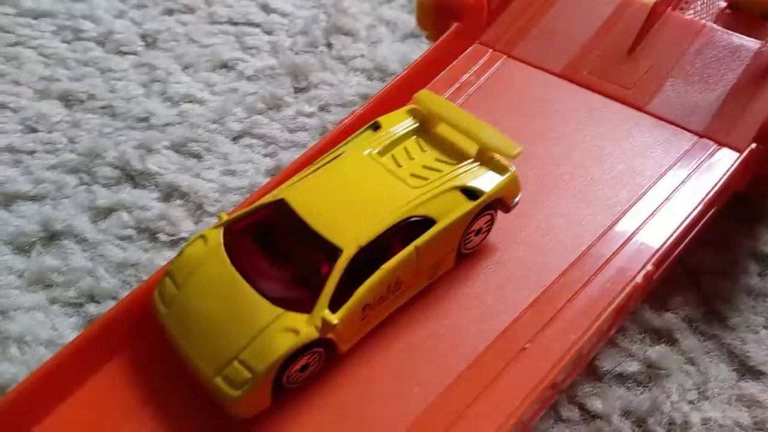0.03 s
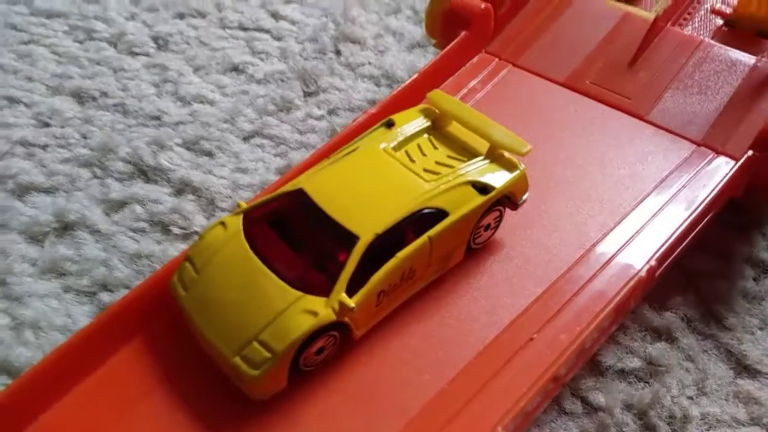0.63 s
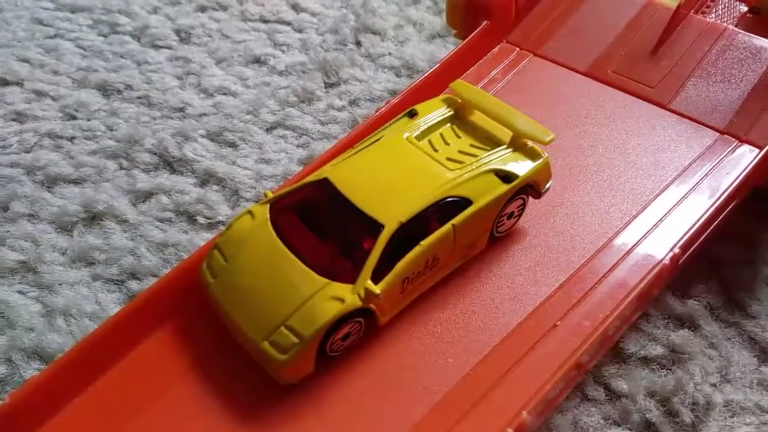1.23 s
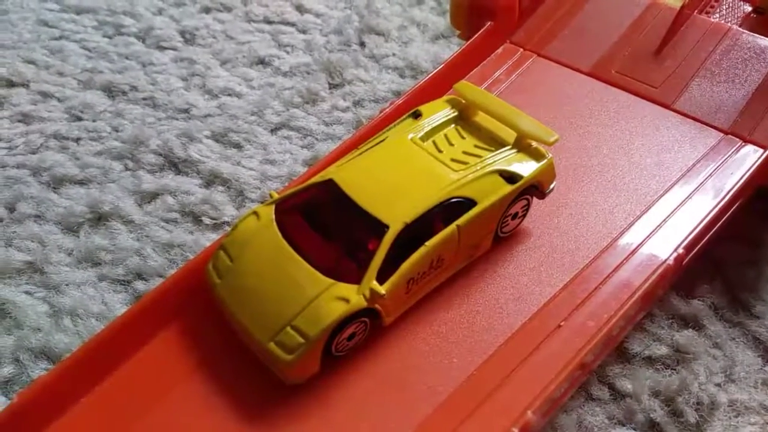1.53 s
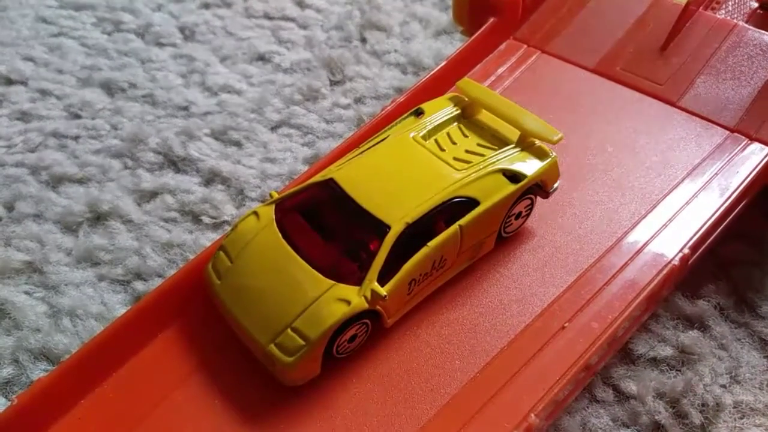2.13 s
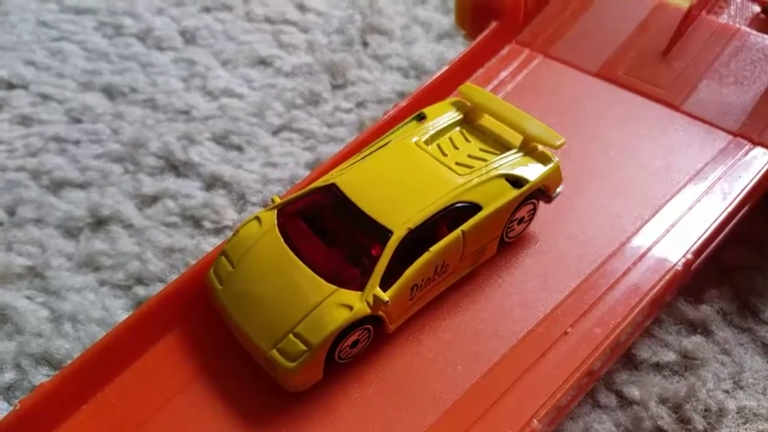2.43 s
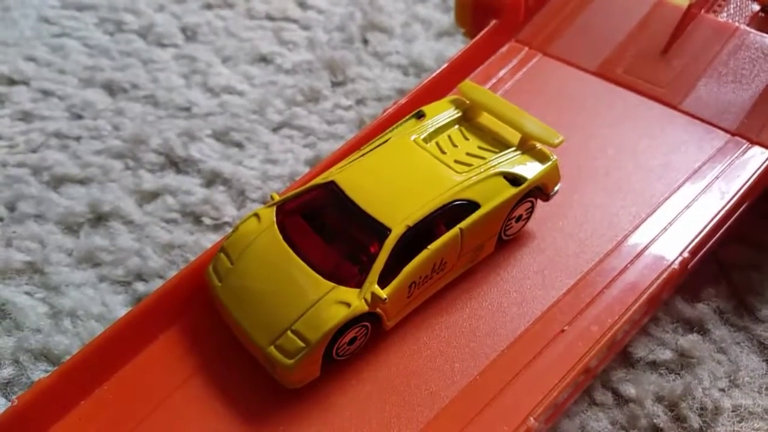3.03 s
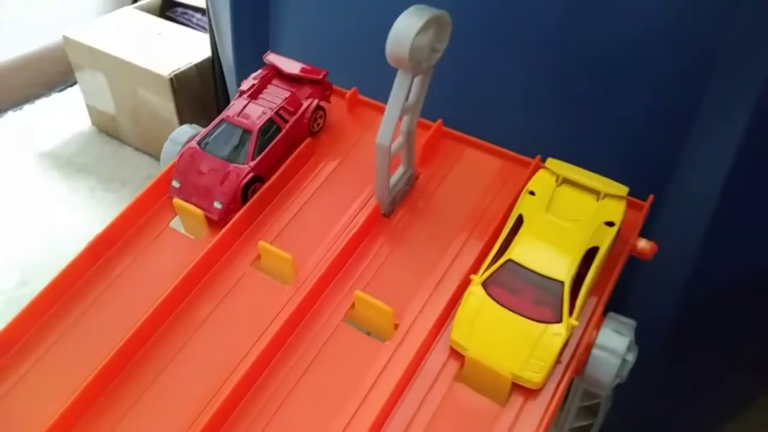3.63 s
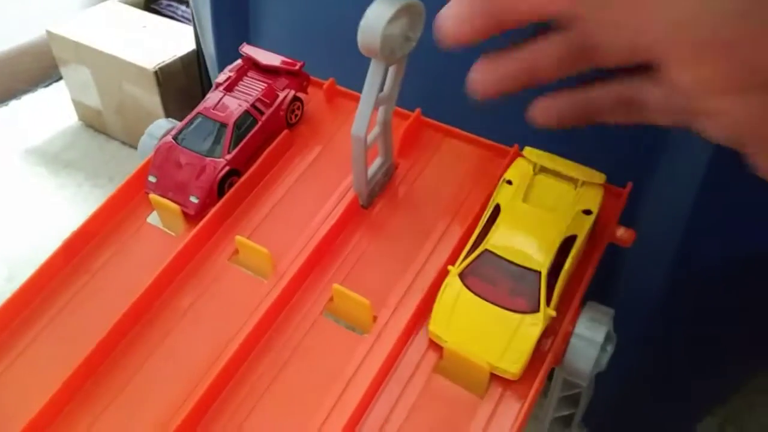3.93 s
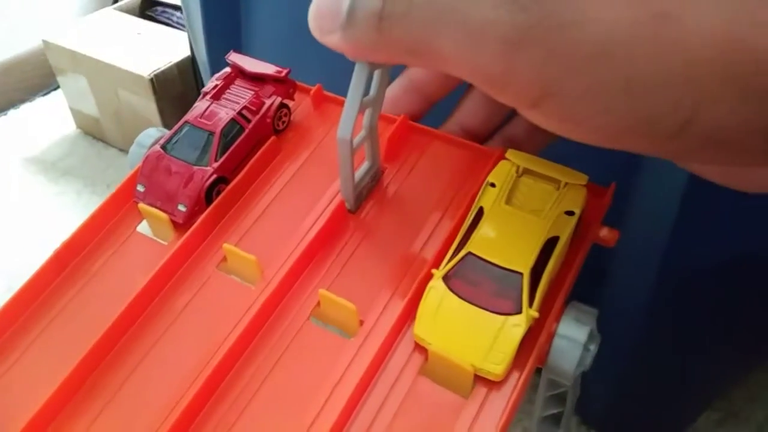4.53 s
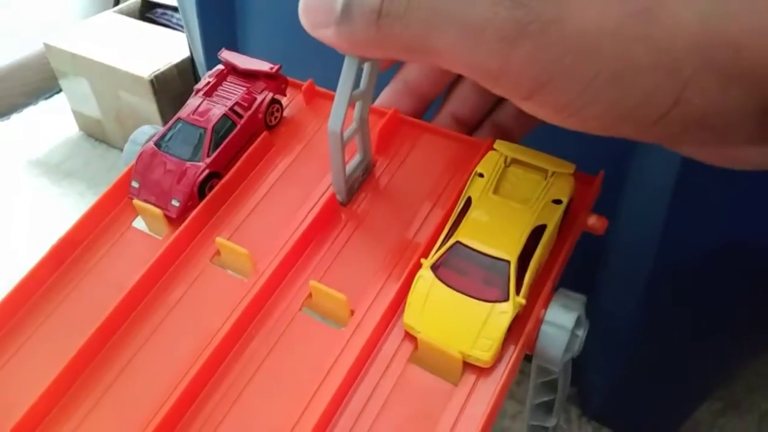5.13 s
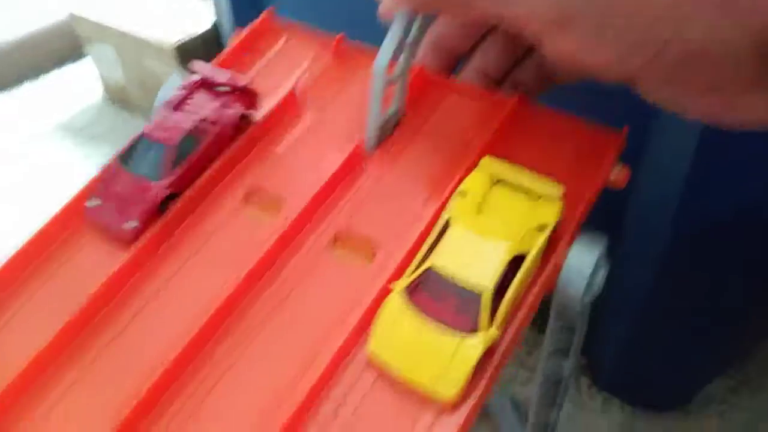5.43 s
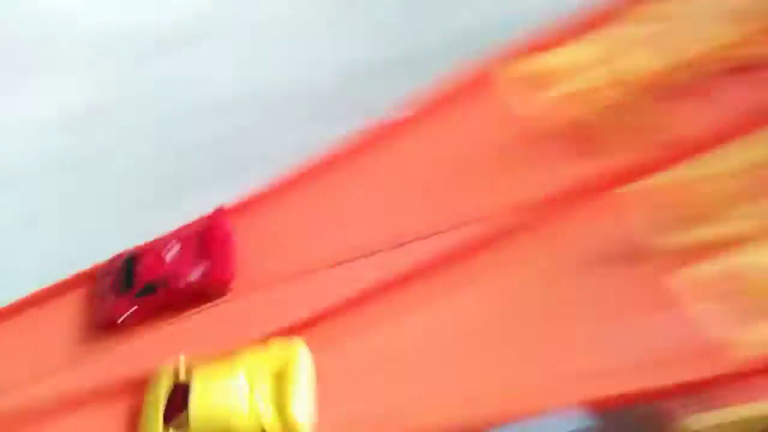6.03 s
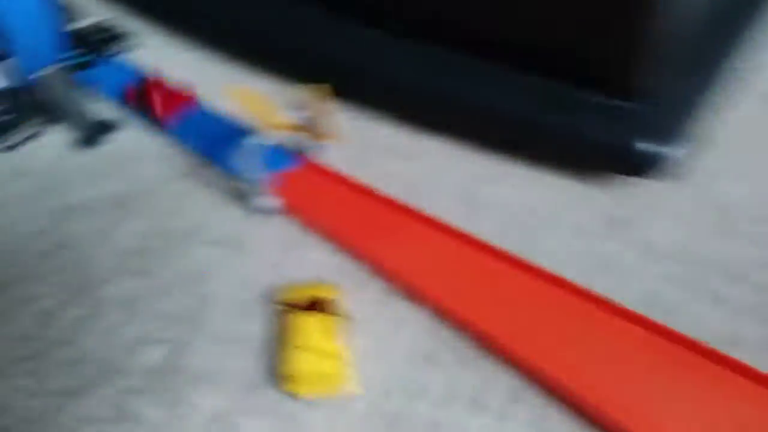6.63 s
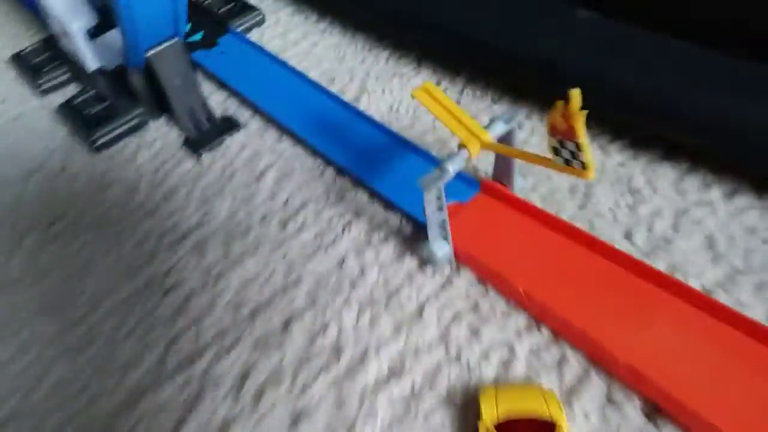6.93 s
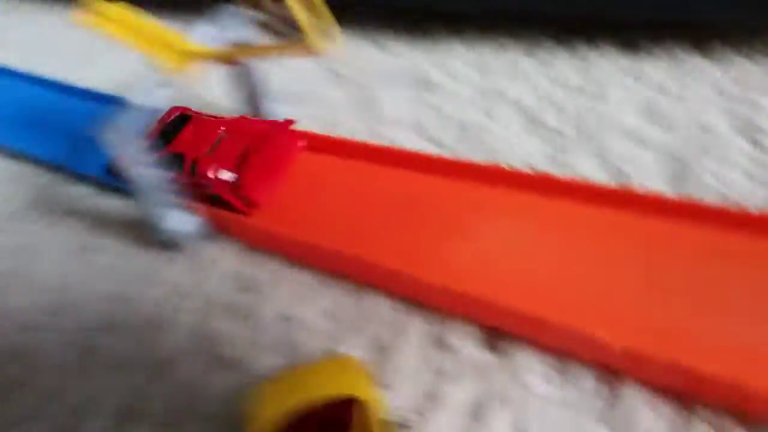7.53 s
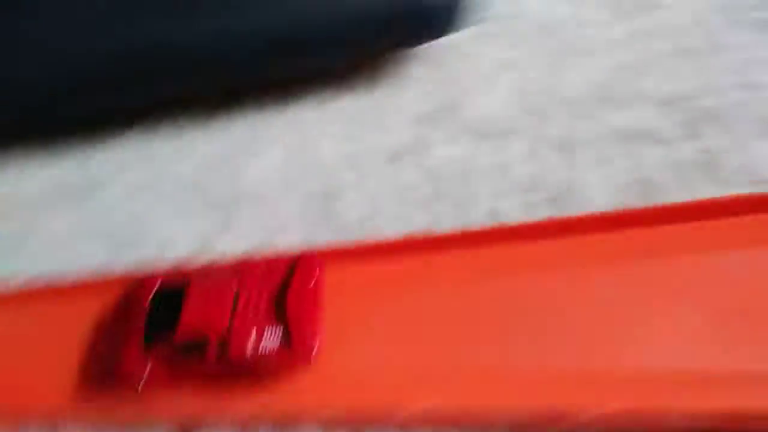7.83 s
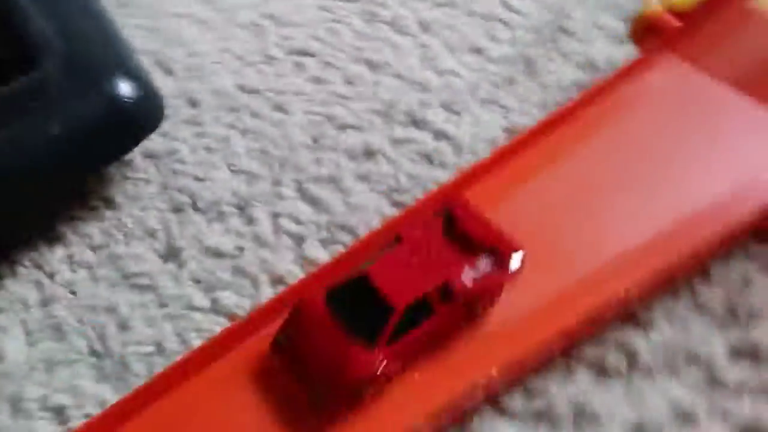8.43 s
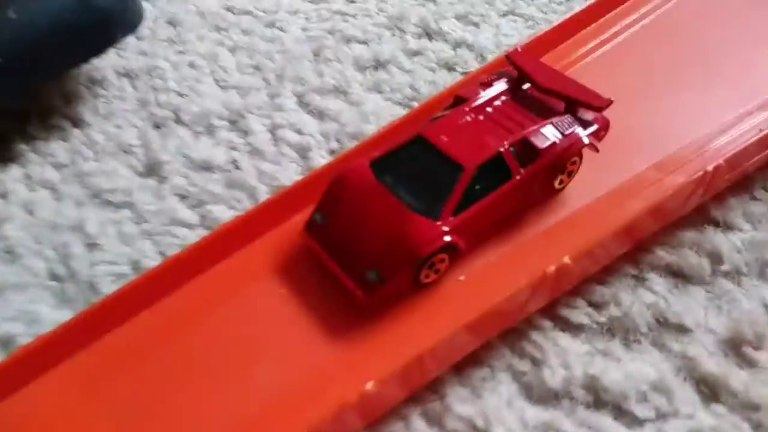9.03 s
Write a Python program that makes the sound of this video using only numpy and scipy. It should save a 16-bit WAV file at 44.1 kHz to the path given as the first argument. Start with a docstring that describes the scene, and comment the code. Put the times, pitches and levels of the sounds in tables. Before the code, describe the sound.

A steady airy rush with a low hum fills a carpeted room, then stops abruptly. After a quiet pause, a start gate clicks and two small metal toy cars rattle down a plastic track close to the microphone, growing loud as they clatter over the joints. The rattle fades with a few knocks, then one car rolls back softly, clacks once more and comes to rest.

```python
"""A steady airy rush with a low hum breaks off abruptly at 3.2 s; then a quiet carpeted room is heard, and
faint hollow tones come and go. One microphone stands near a plastic track. A start gate clicks and two die-cast
toy cars rattle down, louder with speed and nearness: hard wheels patter, the track booms, axles jingle, the
joints clatter. One car flies off; the other knocks the finish gate, rolls back through it and comes to rest."""
import sys
import numpy as np
from scipy import signal
from scipy.fft import rfft, irfft, next_fast_len
from scipy.io import wavfile
from scipy.ndimage import uniform_filter1d, map_coordinates

SR = 44100
rng = np.random.default_rng(int(sys.argv[2]) if len(sys.argv) > 2 else 0)


def int16_out(signal):
    """Quantize to a 16-bit WAV file."""
    q = np.round(np.clip(np.atleast_2d(signal).T, -1, 1) * 32767)
    wavfile.write(sys.argv[1], SR, q.astype(np.int16))


N = 409688

# Decay of the carpeted room: frequency_hz, t60_s
ROOM_DECAY = [(200, 0.051), (1000, 0.54), (3000, 0.76), (8000, 0.15), (15000, 0.26)]
# Notches of the microphone port: centre_hz, width_hz, depth_fraction
PORT_NOTCHES = [(7120, 150, 0.7), (9500, 220, .82)]
# Room air at the top of the track: frequency_hz, relative_db
AIR_TOP_SPECTRUM = [(60, -39.5), (170, -20.5), (300, -21.5), (620, -11), (850, -13.5), (1030, -2.5),
                    (1400, -18), (2000, -11.5), (3100, -18.5), (3600, -13.5), (5400, -27), (7000, -46.5)]
# Room air at the foot of the track: frequency_hz, relative_db
AIR_FOOT_SPECTRUM = [(60, -28), (130, -26.5), (350, -12), (600, -8), (1850, -7.5), (2300, -5.5), (3100, -4),
                     (4500, -9), (5500, -19), (7000, -35.5)]
# Brief swish at the moment the rush breaks off: frequency_hz, relative_db
SWISH_SPECTRUM = [(200, -33), (850, -20.5), (1020, 2.5), (1200, -11), (1460, -4), (2350, 2), (3000, -17),
                  (7000, -49.5)]
# Swells of the low drone: centre_s, half_width_s, level_db
DRONE_SWELLS = [(1.965, 0.096, -52), (6.688, 0.26, -54), (8.333, 0.13, -67.5)]
# Faint hollow tones: centre_s, half_width_s, pitch_hz, relative_db
HOLLOW_TONES = [(1.62, 0.074, 453, -40), (2.765, 0.045, 433, -37.5), (3.674, 0.11, 420, -50),
                (3.826, 0.27, 991, -54.5), (3.93, 0.065, 479, -52), (4.332, 0.037, 448, -53.5),
                (4.47, 0.076, 448, -48.5), (4.621, 0.03, 445, -53), (4.76, 0.11, 1100, -55),
                (8.603, 0.15, 368, -57), (8.868, 0.054, 469.6, -47), (8.955, 0.091, 446, -41.5),
                (9.038, 0.028, 2385, -54), (9.155, 0.036, 2367, -55)]

# Growth of the rush: time_s, body_relative_db, hiss_db
RUSH_LEVELS = [(0, -49.5, -84), (.45, -44.5, -79), (1, -43, -66), (1.8, -42.5, -57), (3.2, -43.5, -58)]
# Body of the rush: frequency_hz, relative_db
RUSH_BODY_SPECTRUM = [(30, -67), (60, -38), (120, -35.5), (220, -2.5), (450, -1), (660, 3.5), (750, -6.5),
                      (850, -16), (970, -16), (1150, -1.5), (1400, 0), (1700, -7), (2050, -6.5),
                      (2250, -39), (2480, -33.5), (3400, -56), (5000, -54), (6700, -41.5), (11000, -61)]
# Thin hiss above it: frequency_hz, relative_db
RUSH_HISS_SPECTRUM = [(3000, -24), (3600, -11.5), (4000, 7), (4300, 3.5), (4550, 7), (4900, 1.5),
                      (5400, -30), (6200, -50), (6700, -51), (8000, -49), (10000, -64)]
# Hum lines in the rush: start_s, end_s, first_hz, last_hz, level_db
HUM_LINES = [(.75, 1.42, 266, 276, -50), (.8, 1.36, 334, 334, -53), (1.42, 2.25, 277, 290, -58),
             (2.25, 3.22, 291, 302, -55)]

# Ringing modes of the plastic track: pitch_hz, relative_db, t60_s
TRACK_MODES = [(560, -11, 0.075), (850, 1, 0.042), (1010, 8, 0.014), (1128, 4, .04), (1543, -1, 0.042),
               (2030, -8.5, 0.05), (2290, -3.5, 0.05), (2910, -6.5, 0.036), (3160, -7, 0.04),
               (4020, -9.5, .03), (4930, -5, 0.06)]
# Boom of the track: frequency_hz, relative_db
BOOM_SPECTRUM = [(30, -59.5), (120, -38), (250, -13), (400, -6), (600, -3.5), (800, 0), (1150, -1),
                 (1500, -3.5), (2200, -21.5), (6000, -70.5)]
# Fast wheels on plastic: frequency_hz, relative_db
WHEEL_SPECTRUM = [(590, -47), (1000, -12), (1090, -5.5), (1310, -2), (1810, 2), (3300, 0.5), (4900, -3.5),
                  (5750, -11), (6800, -17), (8170, -26), (12000, -42.5), (15600, -63.5), (22000, -120)]
# Hollow colour of slow wheels: frequency_hz, relative_db
SLOW_WHEEL_SPECTRUM = [(300, -43), (580, -19), (790, -24), (1010, 7.5), (1300, -17.5), (1800, 7), (2150, 3),
                       (3100, 5), (4200, -5), (5400, -14.5), (7000, -35), (11000, -49)]
# Bright jingle of loose metal: frequency_hz, relative_db
JINGLE_SPECTRUM = [(1000, -60.5), (3500, -28), (6000, 1.5), (8200, 3.5), (11000, -4.5), (15500, -15.5)]
# Ring of a die-cast chassis: frequency_hz, relative_db
CHASSIS_SPECTRUM = [(500, -43), (1200, -6.5), (2400, -8.5), (3050, 5), (3700, -7), (4600, -4),
                    (6000, -13.5), (7500, -27.5), (15000, -44)]
# The race, louder with speed and nearness to the microphone: time_s, relative_db
RACE_LEVELS = [(5.29, -48.5), (5.36, -47.5), (5.535, -31.5), (5.771, -23.5), (5.845, -18.5), (5.965, -24.5),
               (6.06, -18.5), (6.193, -20.5), (6.331, -27.5), (6.377, -26), (6.615, -43), (6.679, -34.5),
               (6.791, -43.5), (6.95, -64.5)]
# The gate lever gives, a car nudges or scrapes a wall:
# start_s, level_db, centre_hz, fall_db_per_octave, rise_s, t60_s
BRUSHES = [(5.239, -54, 3100, 40, .002, .08), (5.266, -31.5, 1000, 11, .003, .06),
           (7.004, -29.5, 1050, 24, .008, .075), (7.862, -36, 1650, 45, .024, .14)]
# Axles and metal bodies click: start_s, ring_db, tick_db
METAL_CLICKS = [(6.129, -18.5, -37.5), (6.463, -25, -53), (6.485, -24.5, -55.5), (6.503, -28.5, -50.5),
                (7.088, -44.5, -60.5), (7.117, -38, -50), (7.14, -34.5, -56.5), (7.176, -37.5, -55),
                (7.449, -23, -45), (7.525, -25.5, -43), (7.617, -34.5, -69.5)]
# Cars strike the gates, joints and walls:
# start_s, clack_db, clack_centre_hz, panel_db, panel_pitch_hz, panel_t60_s, tick_db
KNOCKS = [(5.269, -47.5, 1400, -39, 779, .08, -89.5), (5.799, -17.5, 1913, -22, 1005, 0.058, -31),
          (5.813, -14, 2510, -17.5, 733, 0.079, -28), (5.835, -11, 1807, -15.5, 1102, 0.1, -23.5),
          (5.84, -14, 2000, -16, 1740, 0.036, -27), (5.861, -11.5, 2030, -17.5, 1048, 0.054, -25.5),
          (5.872, -13, 1802, -13, 760, 0.023, -35.5), (5.878, -19.5, 2680, -24.5, 1090, .03, -23),
          (5.886, -12.5, 2096, -21.5, 780, 0.025, -29), (5.899, -19, 2014, -14, 2060, 0.033, -43.5),
          (5.909, -16, 2012, -16, 1840, .04, -44), (5.917, -21, 1990, -17, 1554, .02, -45),
          (5.94, -16, 2210, -9.5, 741, .035, -30), (5.965, -17, 1600, -8.5, 660, 0.041, -41),
          (6.017, -26, 1874, -19, 770, .05, -47.5), (6.123, -17.5, 2850, -25.5, 910, 0.045, -31),
          (6.154, -10.5, 2400, -15, 1380, 0.051, -23), (6.168, -15.5, 2500, -19.5, 730, 0.025, -25.5),
          (6.187, -17, 2490, -20.5, 695, 0.053, -26.5), (6.203, -17.5, 2600, -20, 1280, 0.034, -24),
          (6.231, -16.5, 2688, -25, 1680, .02, -33), (6.252, -18.5, 2500, -18, 891, 0.086, -39),
          (6.277, -19.5, 1600, -14, 1196, 0.049, -46.5), (6.362, -17, 2700, -19, 1050, 0.034, -37),
          (6.368, -29, 1600, -20.5, 847, 0.085, -35.5), (6.659, -26.5, 1993, -24, 1176, 0.031, -37.5),
          (6.681, -38, 1600, -24.5, 944, 0.051, -55), (6.713, -28, 2800, -28, 1240, 0.036, -44.5),
          (6.744, -38, 2000, -23, 916, 0.02, -55.5), (6.772, -28.5, 1970, -17, 1030, 0.023, -50.5),
          (6.792, -40, 1803, -24.5, 840, 0.026, -51.5), (7.462, -18, 2000, -19, 1010, 0.019, -42),
          (7.466, -28, 1202, -30, 632, 0.064, -60)]

RUSH_END_S, AIR_RISE_S, AIR_FADE_DB_PER_S = 3.213, 0.28, 4.5
BACK_START_S, BACK_SLOWS_S, BACK_CREEPS_S, BACK_STOP_S = 7.03, 7.67, 7.98, 8.2  # the car rolling back
BACK_FADE_DB_PER_S, CREEP_HIGHPASS_HZ = 31, 2290
DULL_HZ, BRIGHT_FROM_S, BRIGHTENS_S = 4940, 5.43, 0.155  # wheels gain treble as the cars gather speed
AXLES_SETTLE_DB, SETTLE_DB_PER_DB = -34, 1.7  # below this race level the jingle falls away faster
CLACK_T60_S, TICK_T60_S, CLICK_T60_S = 0.028, 0.062, .032
THUD_DB, OVERTONE_DB, OVERTONE_RATIO = -7, -9.5, 1.6  # against a panel's own note
CLIP_LEVEL, BAND_LIMIT_HZ = .53, 15700


def amp(db):
    """Decibels to gain."""
    return 10 ** (np.asarray(db) / 20)


def unit(x):
    """Scale to rms 1."""
    return x / np.sqrt(np.mean(x ** 2) + 1e-20)


def clock():
    """Time of each sample in seconds."""
    return np.arange(N) / SR


def along(points, hz):
    """Interpolate (frequency_hz, value) points on a log axis."""
    frequencies, values = np.transpose(points)
    return np.interp(np.log(hz + 1), np.log(frequencies + 1), values)


def curves(rows):
    """One value per sample for each column after the time."""
    times, *columns = np.transpose(rows)
    return [np.interp(clock(), times, column) for column in columns]


def between(start_s, end_s, fade_s):
    """1 from start to end, with linear fades centred on both."""
    return np.clip(np.minimum(clock() - start_s, end_s - clock()) / fade_s + .5, 0, 1)


def swell(t, centre_s, half_width_s):
    """A bell-shaped rise and fall."""
    return np.exp(-3 * np.minimum(((t - centre_s) / half_width_s) ** 2, 10))


def wobble(rate_hz):
    """A smooth random curve with rate_hz knots a second."""
    return map_coordinates(rng.standard_normal(int(N * rate_hz / SR) + 4), [clock() * rate_hz])


def filtered(x, response):
    """Weight the spectrum of x by a function of frequency."""
    size = next_fast_len(N + SR // 2)
    return irfft(rfft(x, size) * response(np.fft.rfftfreq(size, 1 / SR)), size)[:N]


def colour(x, spectrum, size=4096):
    """Minimum-phase filter of unit energy, shaped like the spectrum."""
    cepstrum = irfft(np.log(amp(along(spectrum, np.fft.rfftfreq(size, 1 / SR)))))
    cepstrum[1:size // 2] *= 2
    cepstrum[size // 2 + 1:] = 0
    pulse = irfft(np.exp(rfft(cepstrum)))
    return signal.fftconvolve(x, pulse / np.linalg.norm(pulse))[:len(x)]


def focused(spectrum, centre_hz, db_per_octave):
    """Tilt a spectrum down on both sides of a centre."""
    hz = np.geomspace(30, SR / 2, 60)
    return np.column_stack([hz, along(spectrum, hz) - db_per_octave * np.abs(np.log2(hz / centre_hz))])


def flicker(x, depth_db, size=1024):
    """The level flickers in small patches of time and frequency, most in the treble; rms 1."""
    hz, _, frames = signal.stft(x, SR, nperseg=size)
    patches = uniform_filter1d(rng.standard_normal(frames.shape), size=3, axis=0)
    patches = unit(uniform_filter1d(patches, size=6, axis=1))
    band_depth_db = depth_db * np.clip(hz / 2200, .3, 1)[:, None]
    return unit(signal.istft(frames * amp(band_depth_db * patches), nperseg=size)[1][:N])


def noise_band(hz, width_hz):
    """A narrow band of noise, rms 1."""
    return unit(filtered(rng.standard_normal(N), lambda f: 1 / (1 + ((f - hz) / width_hz) ** 4)))


def air_noise(spectrum, flicker_db):
    """Coloured, flickering noise, rms 1."""
    return unit(colour(flicker(rng.standard_normal(N), flicker_db), spectrum))


def room(x, wet_db, places=1, size=256):
    """Direct sound at the microphone plus a diffuse tail, a new one for each place the source passes."""
    wet = np.zeros(N + SR)
    for part in np.array_split(np.arange(N), places):
        if np.abs(x[part]).max() > 1e-7:
            hz, t, frames = signal.stft(rng.standard_normal(SR * 2 // 3), SR, nperseg=size)
            decay = amp(-60 * t / along(ROOM_DECAY, hz)[:, None])
            tail = signal.istft(frames * decay, SR, nperseg=size)[1]
            reverb = signal.fftconvolve(x[part], tail / np.linalg.norm(tail))
            wet[part[0] + size:][:len(reverb)] += reverb
    return x + amp(wet_db) * wet[:N]


def room_tone():
    """Faint air at the top of the track, then at its foot, with a brief swish and a low drone."""
    t, foot_s = clock(), 7
    rise = np.clip((t - RUSH_END_S) / AIR_RISE_S, .45, 1)
    top = amp(-62.5) * rise * between(-1, foot_s, .01) * air_noise(AIR_TOP_SPECTRUM, flicker_db=7.5)
    foot_level = amp(-58 - AIR_FADE_DB_PER_S * (t - foot_s)) * between(foot_s, 10, .01)
    foot = foot_level * air_noise(AIR_FOOT_SPECTRUM, flicker_db=6.5)
    swish_level = amp(-46.5 - 40 * np.abs(t - RUSH_END_S)) * between(RUSH_END_S, 10, 0.0091)
    swish = swish_level * air_noise(SWISH_SPECTRUM, flicker_db=5)
    drone_level = amp(-73) * between(7.43, 10, 0.086)
    drone_level += sum(amp(db) * swell(t, *timing) for *timing, db in DRONE_SWELLS)
    drone = drone_level * (noise_band(232, width_hz=9.8) + noise_band(268, width_hz=90))
    hiss = amp(-90) * rng.standard_normal(N)
    return top + foot + swish + drone + hiss


def hum(start_s, end_s, first_hz, last_hz, level_db, waver):
    """One slightly unsteady line that drifts in pitch."""
    pitch_hz = np.interp(clock(), [start_s, end_s], [first_hz, last_hz])
    phase = 2 * np.pi * np.cumsum(pitch_hz) / SR
    return amp(level_db) * between(start_s, end_s, 0.25) * np.sqrt(2) * np.sin(phase + waver)


def rush():
    """Air noise that broadens as it grows, a thin hiss that flickers then steadies, and passing hums."""
    body_db, hiss_db = curves(RUSH_LEVELS)
    body = amp(body_db - 0.57) * air_noise(RUSH_BODY_SPECTRUM, flicker_db=3.5)
    skirts = amp(hiss_db - 5) * (noise_band(930, width_hz=120) + noise_band(2190, width_hz=120))
    hiss = amp(hiss_db) * air_noise(RUSH_HISS_SPECTRUM, flicker_db=3)
    flutter = amp(np.minimum(hiss_db + 5, -68)) * air_noise(RUSH_HISS_SPECTRUM, flicker_db=8.5)
    waver = 0.31 * wobble(6.0)
    hums = sum(hum(*line, waver) for line in HUM_LINES)
    return (body + skirts + hiss + flutter + hums) * between(-1, RUSH_END_S, .01)


def hollow_tones():
    """Short soft tones in the room that waver in pitch and level."""
    t, tones = clock(), np.zeros(N)
    waver = 1.1 * wobble(80)
    for centre_s, half_width_s, pitch_hz, db in HOLLOW_TONES:
        span = np.abs(t - centre_s) < 2 * half_width_s
        phase = 2 * np.pi * pitch_hz * t[span] + waver[span]
        tones[span] += amp(db) * swell(t[span], centre_s, half_width_s) * np.sin(phase)
    return room(tones * amp(3.2 * wobble(80) - 1.5), wet_db=-10)


def ticks(rate_hz, spread_db):
    """Irregular tiny impacts of uneven size, about rms 1 at any rate."""
    chance = np.clip(rate_hz / SR, 1e-5, 1)
    size = unit(amp(spread_db * np.clip(rng.standard_normal(N), -2, 2)))
    return (rng.random(N) < chance) * np.sign(rng.standard_normal(N)) * size / np.sqrt(chance)


def contact(level_db, t60_s, crack=0):
    """A short chattering contact, led by a crack if it is hard."""
    t = np.arange(SR // 8) / SR
    chatter = rng.standard_normal(len(t))
    chatter[0] += crack
    return amp(level_db - 60 * t / t60_s) * chatter


def track(x, ring_db):
    """Each contact is heard directly and rings the modes of the plastic track."""
    t = np.arange(SR // 5) / SR
    ring = sum(amp(db - 60 * t / t60_s) * np.cos(2 * np.pi * hz * t) for hz, db, t60_s in TRACK_MODES)
    pulse = amp(ring_db) * ring / np.linalg.norm(ring)
    pulse[0] += 1
    return signal.fftconvolve(x, pulse)[:N]


def rolling_back():
    """One car's slow wheels tick unevenly and bring out the hollow resonances of the track."""
    wheel_db = -44.5 - BACK_FADE_DB_PER_S * np.maximum(clock() - BACK_SLOWS_S, 0)
    patter = track(ticks(1500, spread_db=4), ring_db=-11.5)
    wheels = flicker(room(colour(patter, SLOW_WHEEL_SPECTRUM), wet_db=-11), depth_db=4.5)
    # Once the car only creeps, just the treble is left.
    treble = filtered(wheels, lambda f: 1 - 1 / (1 + (f / CREEP_HIGHPASS_HZ) ** 10))
    wheels = treble + (wheels - treble) * between(0, BACK_CREEPS_S, .03)
    jingle = unit(room(colour(ticks(900, spread_db=8), JINGLE_SPECTRUM), wet_db=0))
    level = amp(wheel_db + 0.87 * wobble(28)) * between(BACK_START_S, BACK_STOP_S, 0.092)
    return level * (wheels + amp(-44) * jingle)


def brushes():
    """Soft contacts: a puff of friction swells and dies in one band of the plastic."""
    t = np.arange(SR // 4) / SR
    puffs = np.zeros(N)
    for start_s, level_db, centre_hz, db_per_octave, rise_s, t60_s in BRUSHES:
        envelope = amp(level_db - 60 * t / t60_s) * (1 - np.exp(-(t / rise_s) ** 2))
        band = focused(WHEEL_SPECTRUM, centre_hz, db_per_octave)
        puffs[round(start_s * SR):][:len(t)] += colour(envelope * rng.standard_normal(len(t)), band)
    return room(puffs, wet_db=-9)


def metal_clicks():
    """Metal meets metal: a brief ring of the chassis and a bright tick."""
    ring, tick = np.zeros((2, N))
    for start_s, ring_db, tick_db in METAL_CLICKS:
        span = slice(round(start_s * SR), round(start_s * SR) + SR // 8)
        ring[span] += contact(ring_db, CLICK_T60_S)
        tick[span] += contact(tick_db, TICK_T60_S)
    return room(colour(ring, CHASSIS_SPECTRUM) + colour(tick, JINGLE_SPECTRUM), wet_db=-10.5)


def jolts(settle_s):
    """1 at each knock, dying away as track and chassis settle."""
    times = np.sort([0] + [start_s for start_s, *_ in KNOCKS])
    latest = times[np.searchsorted(times, clock(), side="right") - 1]
    return np.exp((latest - clock()) / settle_s)


def racing():
    """Hard wheels patter, denser with speed; the track booms and axles jingle, more after each knock."""
    race_db, = curves(RACE_LEVELS)
    speed = amp(0.52 * (race_db - race_db.max()))
    patter = track(ticks(2000 + 2400 * speed, spread_db=3), ring_db=-17.5)
    wheels = flicker(room(colour(patter, WHEEL_SPECTRUM), wet_db=-6.5, places=18), depth_db=2.2)
    dull = filtered(wheels, lambda f: 1 / (1 + (f / DULL_HZ) ** 12))
    wheels = dull + (wheels - dull) * np.clip((clock() - BRIGHT_FROM_S) / BRIGHTENS_S, 0, 1)

    bursts = amp(3 * wobble(60))
    boom = unit(room(colour(patter * bursts, BOOM_SPECTRUM), wet_db=-3.5))
    axle_ticks = ticks(900 + 1500 * speed, spread_db=5) * bursts
    jingle = flicker(room(colour(axle_ticks, JINGLE_SPECTRUM), wet_db=2.5), depth_db=3.5, size=256)

    jolt = jolts(settle_s=.09)
    boom_db = -16 + 7.5 * jolt  # boom and jingle are set against the wheels
    jingle_db = -20 + 6 * jolt - SETTLE_DB_PER_DB * np.maximum(AXLES_SETTLE_DB - race_db, 0)
    level = amp(race_db - 1.08 + 1.6 * wobble(45)) * between(5.275, 6.96, 0.02)
    return level * (wheels + amp(boom_db) * boom + amp(jingle_db) * jingle)


def knocks():
    """A car strikes plastic: a clack, the panel's thud and hollow note, and a bright tick of metal."""
    t = np.arange(SR // 8) / SR
    give = 1 - np.exp(-(t / 0.00096) ** 2)  # the panel bends before it rings
    blows, panel, tick = np.zeros((3, N))
    for start_s, clack_db, clack_hz, panel_db, panel_hz, t60_s, tick_db in KNOCKS:
        span = slice(round(start_s * SR), round(start_s * SR) + len(t))
        clack = contact(clack_db, CLACK_T60_S, crack=3.5)
        thud = contact(panel_db + THUD_DB, t60_s)
        blows[span] += colour(clack, focused(WHEEL_SPECTRUM, clack_hz, db_per_octave=2))
        blows[span] += colour(thud, focused(BOOM_SPECTRUM, panel_hz, db_per_octave=6.5))
        phase = 2 * np.pi * panel_hz * t
        note = np.sin(phase) + amp(OVERTONE_DB) * np.sin(OVERTONE_RATIO * phase)
        panel[span] += amp(panel_db - 60 * t / t60_s) * give * note
        tick[span] += contact(tick_db, TICK_T60_S)
    direct = track(blows, ring_db=-18.5) + colour(tick, JINGLE_SPECTRUM) + panel
    return room(direct, wet_db=-8, places=40)


def scene():
    """The room and the cars as they reach one microphone."""
    background = rush() + room_tone() + hollow_tones()
    cars = racing() + rolling_back() + knocks() + brushes() + metal_clicks()
    return (background + cars)[None]


def record(dry):
    """The microphone: its port notches the treble, the loudest peaks clip softly, the band is limited."""
    def port(f):
        notches = [1 - depth / (1 + ((f - hz) / (width_hz / 2)) ** 2)
                   for hz, width_hz, depth in PORT_NOTCHES]
        return np.prod(notches, axis=0)

    notched = filtered(dry[0], port)
    clipped = notched / (1 + np.abs(notched / CLIP_LEVEL) ** 8) ** (1 / 8)
    return filtered(clipped, lambda f: f < BAND_LIMIT_HZ)[None]


dry = scene()
out = record(dry)
int16_out(out)
```